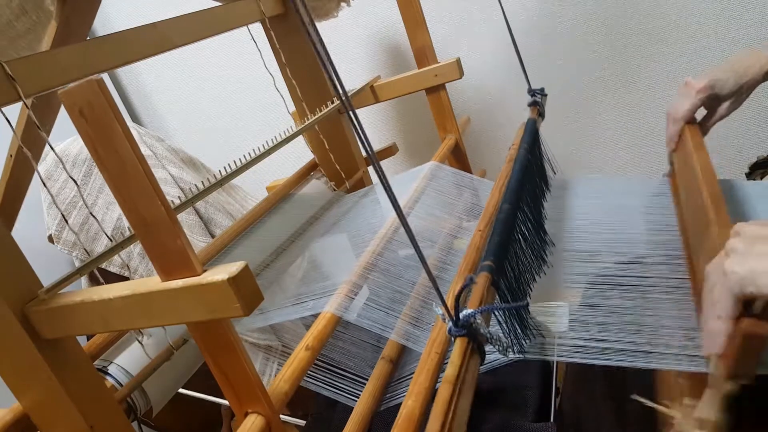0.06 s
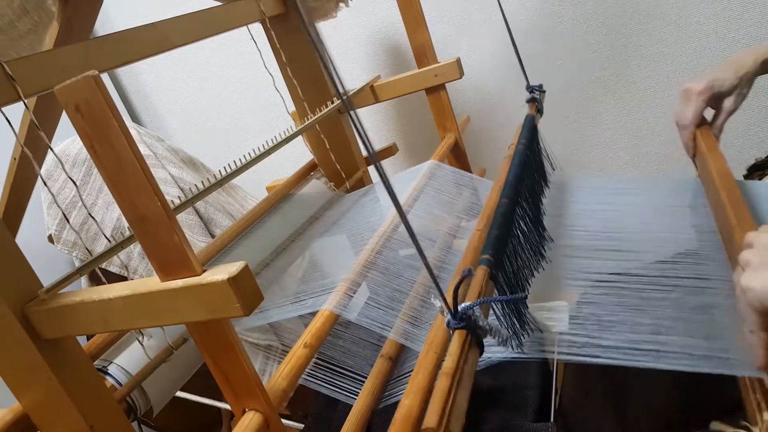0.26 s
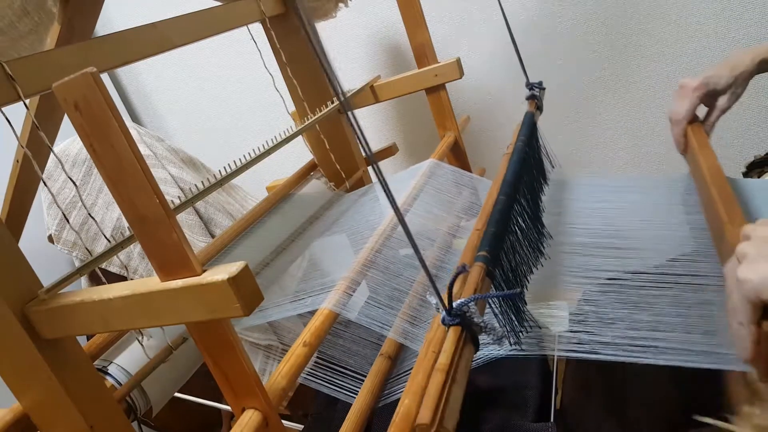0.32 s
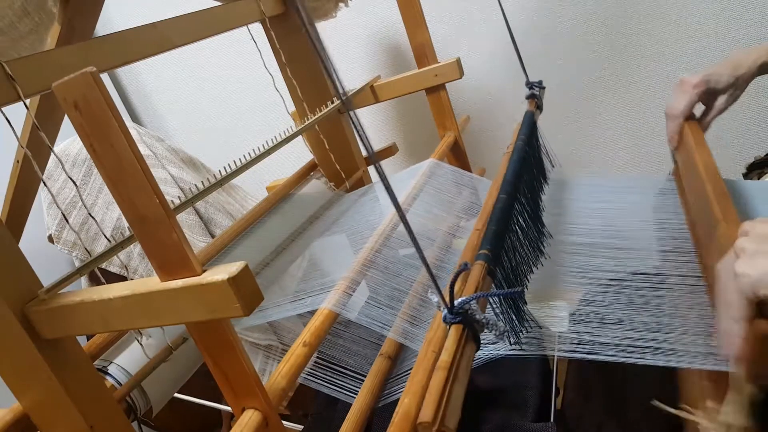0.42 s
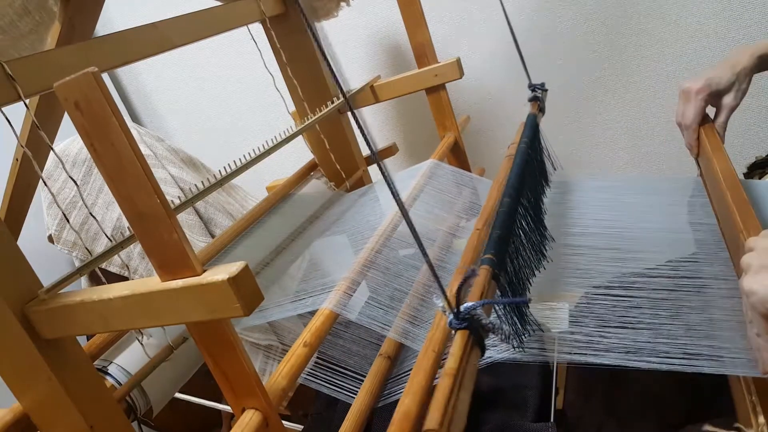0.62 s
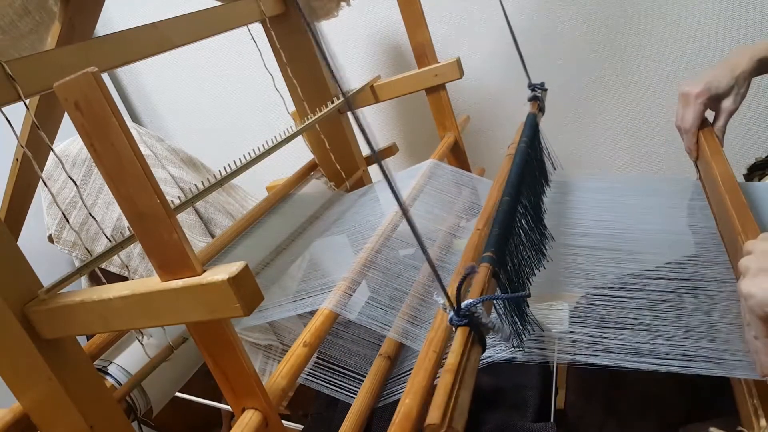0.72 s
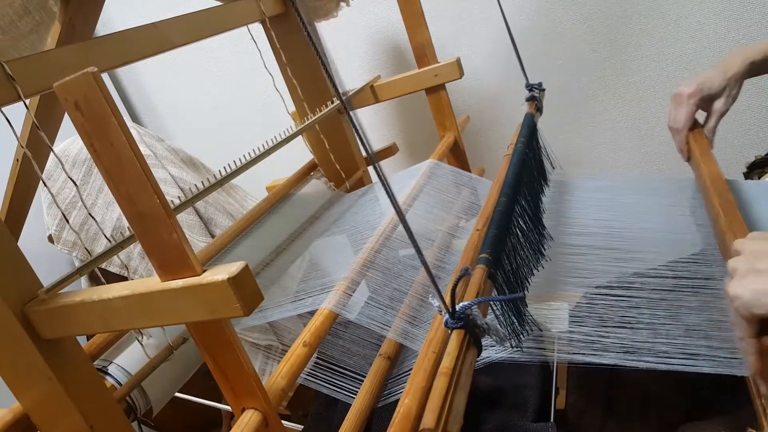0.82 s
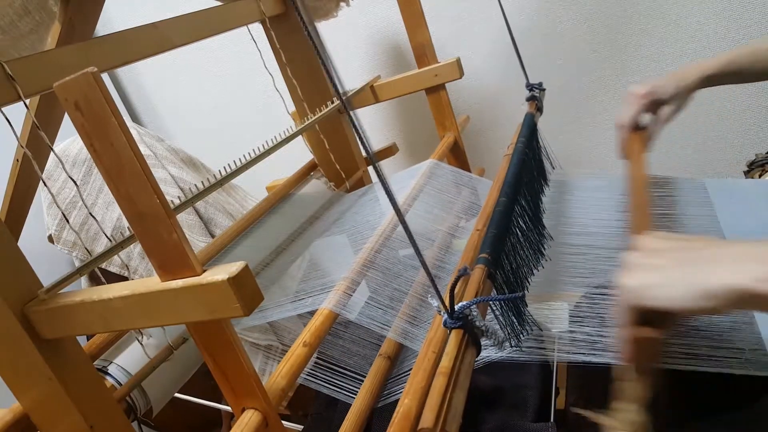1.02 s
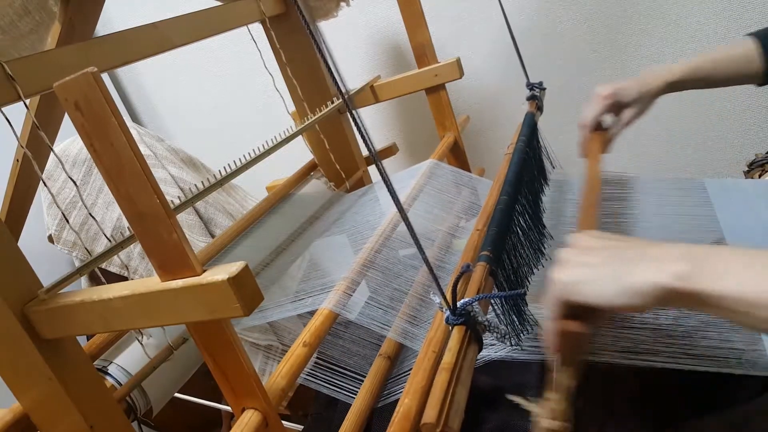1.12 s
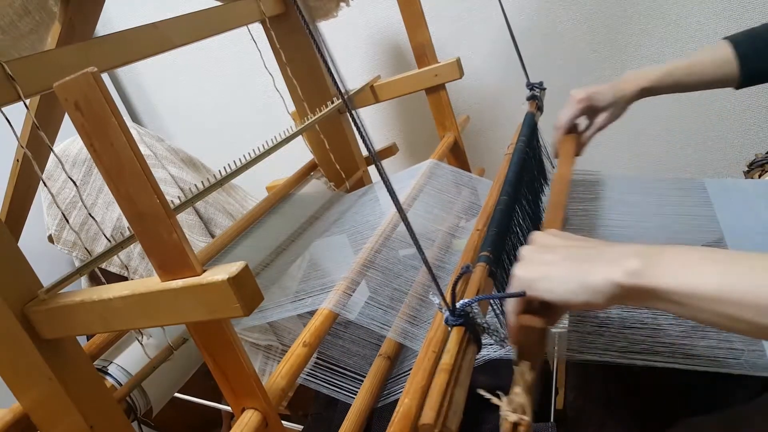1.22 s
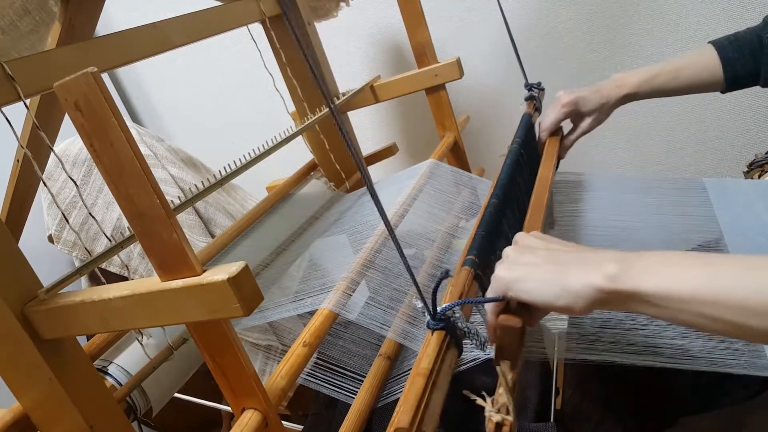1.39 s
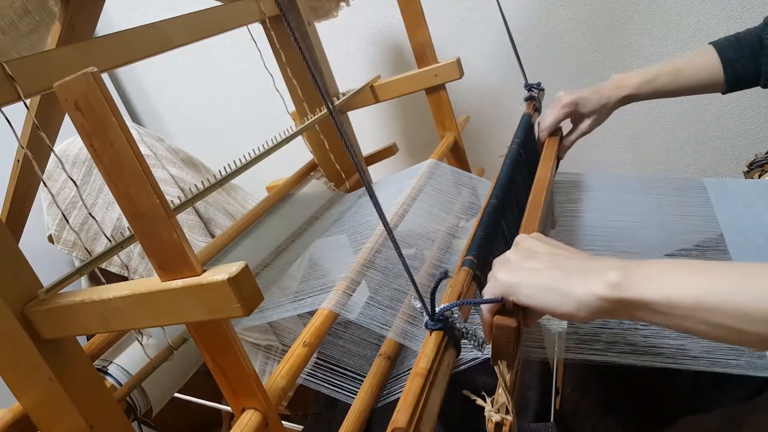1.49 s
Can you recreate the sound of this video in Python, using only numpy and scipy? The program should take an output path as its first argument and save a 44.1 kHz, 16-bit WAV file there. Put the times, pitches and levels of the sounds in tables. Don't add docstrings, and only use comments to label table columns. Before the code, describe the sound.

Wooden hand loom clacks: two rattling reed beats with hard stick knocks in a quiet room

```python
import sys
import numpy as np
from scipy import signal
from scipy.fft import irfft
from scipy.io import wavfile

SR = 44100
rng = np.random.default_rng(int(sys.argv[2]) if len(sys.argv) > 2 else 0)


def gain_from_db(level_db):
    decades = np.asarray(level_db, float) / 20
    return 10 ** decades


def to_wav(sig):
    pcm = np.clip(np.atleast_2d(sig), -1, 1) * 32767
    pcm = np.round(pcm).astype(np.int16)
    wavfile.write(sys.argv[1], SR, pcm.T)


N = 68355
LEAD = 4410

# level in dB, click share in dB, singing share in dB, upper modes in dB.
CLACKS = [
    (-41, -4, 1.5, 0.5),
    (-29.5, 4, 5, 2),
    (-27, 2, 4.5, -2.5),
    (-38.5, -5, 2, 1.5),
]
CLACK_TIMES_S = np.array([-.02, .3501, .6879, .8714])


def rms_one(x):
    return x / np.sqrt(np.mean(x ** 2) + 1e-20)


def at_hz(points, hz):
    table_hz, value = np.array(points)[:, :2].T
    return np.interp(np.log(hz), np.log(table_hz), value)


def bands():
    edges_hz = 22 * 2 ** np.arange(0, 9.6, .5)
    return [(np.sqrt(low * high), signal.butter(2, [low, high], "band", fs=SR, output="sos"))
            for low, high in zip(edges_hz, edges_hz[1:])]


def drift(rate_hz, size):
    r = np.exp(-2 * np.pi * rate_hz / SR)
    wander = signal.lfilter([1], [1, -2 * r, r * r], rng.standard_normal(size + SR))
    return rms_one(wander[SR:])


def stereo_noise(gain, size):
    # frequency in Hz, correlation from -1 to 1.
    likeness = [(30, .35), (60, .65), (140, .93), (300, .8), (640, .4), (1350, -.22), (2600, 0), (15000, 0)]
    out = 0
    white = rng.standard_normal((2, 2, size))
    for k, (hz, sos) in enumerate(bands()):
        mid, side = signal.sosfilt(sos, white[k % 2])
        alike = np.clip(at_hz(likeness, hz), -1, 1)
        pair = np.sqrt(1 + alike) * mid + np.sqrt(1 - alike) * side * [[1], [-1]]
        out = out + gain(hz) * pair
    return out


def ring(clicks, hz, t60_s):
    r = gain_from_db(-60 / (t60_s * SR))
    w = 2 * np.pi * hz / SR
    return signal.lfilter([0, np.sin(w)], [1, -2 * r * np.cos(w), r * r], clicks + 1e-18)


def strike(hit_s, db, modes, spread_db):
    out = 0
    luck = rng.standard_normal((len(hit_s), len(modes)))
    for k, (hz, level_db, t60_s) in enumerate(modes):
        clicks = np.zeros(N + LEAD)
        clicks[(hit_s * SR).astype(int) + LEAD] = gain_from_db(db[:, k] + level_db + spread_db * luck[:, k])
        out = out + ring(clicks, hz, t60_s) * (-1) ** k
    return out


def high_pass(x, hz):
    return signal.sosfilt(signal.butter(3, hz, "high", fs=SR, output="sos"), x)


def reed():
    # start in s, peak in dB, rattle's 60 dB dying time in s.
    landings = [
        (0.228, -52.5, .05),
        (0.231, -32.5, 0.041),
        (.239, -24.5, 0.026),
        (0.2539, -40, 0.025),
        (0.58, -62, 0.021),
        (0.582, -17, 0.02),
        (0.591, -42, 0.01),
        (0.6, -47, 0.013),
    ]
    # frequency in Hz, level in dB per Hz.
    reed_spectrum = [(180, -44), (300, 13.5), (571, -2.5), (1370, 12), (4570, 7.5), (6460, 2), (8420, -1.5),
                     (14300, -7), (15500, -33)]
    level_db, clicks_per_s, spread_db = 1.5, 4000, 1
    t = np.arange(-LEAD, N) / SR
    envelope = 0
    for start_s, db, dying_s in landings:
        envelope = envelope + gain_from_db(db - 60 * np.maximum(t - start_s, 0) / dying_s) * (t >= start_s)
    size_db = spread_db * np.minimum(rng.exponential(1, len(t)), 3)
    size = gain_from_db(size_db) * rng.choice([-1, 1], len(t))
    clicks = rms_one(size * (rng.random(len(t)) < clicks_per_s / SR))
    shape = gain_from_db(at_hz(reed_spectrum, np.maximum(np.fft.rfftfreq(256, 1 / SR), 20)))
    colour = np.roll(irfft(shape), 16)[:128] * np.hanning(130)[1:-1] ** .25
    colour = colour / np.linalg.norm(colour)
    return gain_from_db(level_db) * signal.lfilter(colour, 1, np.roll(clicks * envelope, -16))


def frame():
    # start in s, level in dB, beam pitch in Hz.
    knocks = [(.233, -31.5, 620), (.250, -36.5, 500), (.268, -37.5, 840), (.280, -32, 880),
              (.303, -33.5, 327), (.310, -48, 940), (.330, -41, 400), (.582, -27.5, 500),
              (0.597, -28.5, 330), (.607, -29.5, 585), (.622, -31, 450), (.628, -30, 980),
              (0.654, -32.5, 460), (.676, -30.5, 390), (.700, -37.5, 756)]
    # frequency in Hz, level in dB, t60 in s.
    frame_modes = [(94, -11, 0.07), (221, 6.5, 0.037), (271, -28, 0.017), (341.7, -0.5, 0.075),
                   (415.5, -1, 0.05), (500, 3, 0.02), (613.7, 0.5, 0.12), (737, 3.5, 0.027),
                   (863, 5, 0.027), (913, 7.5, 0.037), (1092, 10, 0.028), (1177, 10, 0.019),
                   (1594, 16, 0.011)]
    level_db, width_oct = -6, 0.79
    start_s, db, beam_hz = np.transpose(knocks)
    octaves = np.log2(np.array(frame_modes)[:, 0] / beam_hz[:, None])
    mode_db = level_db + db[:, None] - 10 * (octaves / width_oct) ** 2
    return strike(start_s, mode_db, frame_modes, spread_db=3.5)


def upper_share(modes):
    hz = np.array(modes)[:, 0]
    return np.outer(np.array(CLACKS)[:, 3], (hz > 2300) & (hz < 2900))


def stick():
    # frequency in Hz, level in dB, t60 in s.
    stick_modes = [(480, -12, .02), (720, -11, .02), (980, -7, .02), (1300, -8, .015), (1760, -3, .025),
                   (2200, -6, .012), (2620, 0, .025), (3300, -6, .008), (3850, -7, .008), (4900, -5, .014),
                   (5700, -10, .006), (7600, -13, .006), (10500, -11, .005)]
    level_db, crack_db, crack_t60_s = 2, -3.0, 0.01
    db, click_db = np.transpose(CLACKS)[:2]
    since_s = np.arange(-LEAD, N) / SR - CLACK_TIMES_S[:, None]
    burst_db = (db + click_db + crack_db)[:, None] - 60 * np.abs(since_s) / crack_t60_s
    burst = np.sum(gain_from_db(burst_db) * (since_s >= 0), axis=0)
    crack_band = signal.butter(2, [650, 11000], "band", fs=SR, output="sos")
    crack = signal.sosfilt(crack_band, burst * rng.standard_normal(N + LEAD))
    mode_db = level_db + db[:, None] + upper_share(stick_modes)
    return strike(CLACK_TIMES_S, mode_db, stick_modes, spread_db=3.4) + crack


def singing():
    # frequency in Hz, level in dB, t60 in s.
    lines = [(915, -16, .4), (958, -13, .4), (1045, -15, .35), (1700, -9, .35), (1742, -3, .35),
             (1787, 0, .35), (2426, -11, .3), (2505, -9, .3), (2580, -7, .33), (2614, -4, .33),
             (2686, -5, .33), (2783, -9, .25)]
    level_db, t60_scale = -14, .85
    db, _, sing_db, _ = np.transpose(CLACKS)
    modes = np.array(lines) * [1, 1, t60_scale]
    mode_db = level_db + (db + sing_db)[:, None] + upper_share(lines)
    sides = []
    for lag_s in (.0033, .0021):
        arrival_s = CLACK_TIMES_S + lag_s
        first = strike(arrival_s, mode_db, modes, spread_db=1.5)
        second = strike(arrival_s + .0071, mode_db - 4, modes, spread_db=2.5)
        sides.append(first + second)
    return np.array(sides)[:, LEAD:]


def boom():
    # start in s, level in dB.
    thuds = [
        (.240, -43.5),
        (.585, -33.5),
        (0.641, -44.5),
    ]
    # frequency in Hz, level in dB, t60 in s.
    floor_modes = [(123, -14, 0.44), (146, 1, 0.21), (172.5, -2.5, 0.36)]
    start_s, db = np.transpose(thuds)
    rung = strike(start_s, np.outer(db, np.ones(len(floor_modes))), floor_modes, spread_db=2.0)
    return signal.sosfilt(signal.butter(2, [90, 260], "band", fs=SR, output="sos"), rung)[LEAD:]


def slide():
    # time in s, level in dB.
    strokes = [(0.98, -82), (1.006, -95), (1.014, -92), (1.046, -101), (1.122, -65.5), (1.232, -90),
               (1.304, -64), (1.462, -67.5), (1.55, -81)]
    # frequency in Hz, level in dB per Hz.
    thread_spectrum = [(410, -30), (700, -12), (942, -16), (1010, -5), (1630, 1), (2070, -12), (2880, 1),
                       (12000, -29), (15600, -63), (22000, -120)]
    hum_hz, hum_width_hz, hum_db, hum_s, hum_span_s = 1625, 60, -76, 1.4, .11
    time_s, db = np.transpose(strokes)
    t = np.arange(N) / SR

    def hiss_gain(hz):
        return gain_from_db(at_hz(thread_spectrum, hz) - 23 * (hz < 600) + 0.67 * drift(27, N))

    hiss = rms_one(stereo_noise(hiss_gain, N))
    hum = rms_one(ring(rng.standard_normal((2, N)), hum_hz, 2.2 / hum_width_hz))
    swell = np.exp(-((t - hum_s) / hum_span_s) ** 4)
    return gain_from_db(np.interp(t, time_s, db, left=-110)) * hiss + gain_from_db(hum_db) * swell * hum


def room(x, place):
    # frequency in Hz, t60 in s.
    room_t60 = [(100, 0.43), (500, 0.33), (2000, 0.35), (5000, 0.21), (14000, 0.13)]
    tail_db, fill_s = 2, 0.0013
    left_lag_s, pan_db, direct_db = place
    t = np.arange(SR // 2) / SR

    def decay(hz):
        t60_s = at_hz(room_t60, hz)
        return gain_from_db(-60 * t / t60_s) / np.sqrt(t60_s)

    tail = stereo_noise(decay, len(t)) * (1 - np.exp(-t / fill_s))
    tail = gain_from_db(tail_db) * tail / np.sqrt(np.sum(tail ** 2) / 2)
    side_db = direct_db + pan_db * np.array([[.5], [-.5]])
    direct = np.array([np.roll(x, round(left_lag_s * SR)), x]) * gain_from_db(side_db)
    reflected = signal.fftconvolve(tail, x[None], axes=1)[:, :len(x)]
    return (direct + reflected)[:, LEAD:]


def still(spectrum, db, patchy_db):
    def gain(hz):
        return gain_from_db(at_hz(spectrum, hz) + patchy_db * drift(21, N + LEAD))

    return gain_from_db(db) * rms_one(stereo_noise(gain, N + LEAD)[:, LEAD:])


def air():
    # frequency in Hz, level in dB per Hz.
    air_spectrum = [(350, -40), (600, -2), (915, -3), (1220, -10), (1320, -0.5), (8870, -21), (13900, -23),
                    (15500, -33)]
    return still(air_spectrum, -68.5, patchy_db=0.24)


def rumble():
    # frequency in Hz, level in dB per Hz.
    rumble_spectrum = [(13, -49), (22, -6), (65, -9.5), (96, -12.5), (134, -11.5), (240, -3), (273, -13),
                       (335, -10), (700, -31), (910, -73), (1540, -120)]
    return still(rumble_spectrum, -67.5, patchy_db=0.0)


def scene():
    # left lag in s, left louder in dB, direct share in dB.
    reed_place = (.00025, .5, -3)
    frame_place = (.00012, 0, -2)
    stick_place = (.00029, 2, 5)
    loom = room(high_pass(reed(), 277), reed_place)
    loom = loom + room(high_pass(frame(), 92), frame_place)
    loom = loom + room(high_pass(stick(), 283), stick_place)
    loom = loom + singing() + boom()
    return loom + slide() + air() + rumble()


def low_pass(x):
    return signal.sosfilt(signal.butter(12, 15760, fs=SR, output="sos"), x)


def record(dry):
    mix = signal.sosfilt(signal.cheby2(12, 24, 15100, fs=SR, output="sos"), dry)
    return low_pass(mix)


dry = scene()
out = record(dry)
to_wav(out)
```